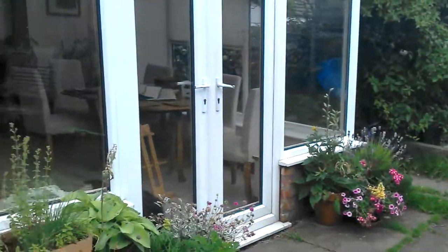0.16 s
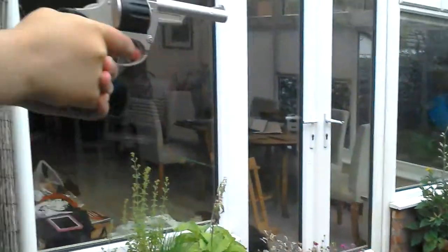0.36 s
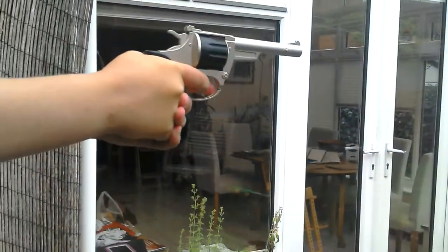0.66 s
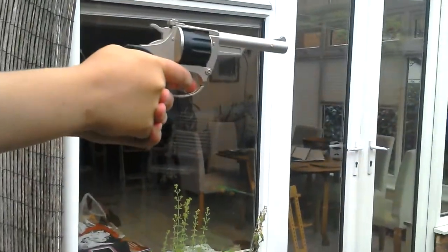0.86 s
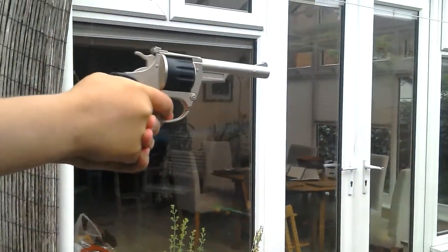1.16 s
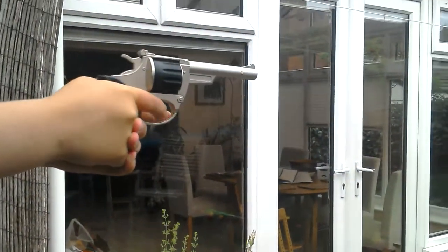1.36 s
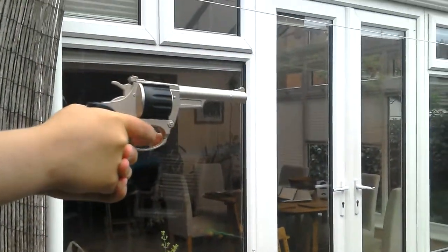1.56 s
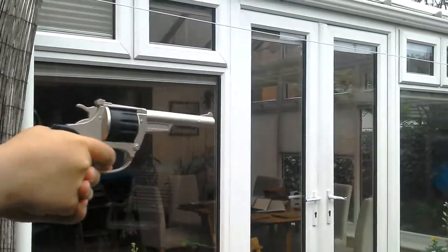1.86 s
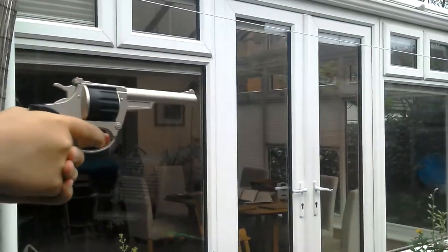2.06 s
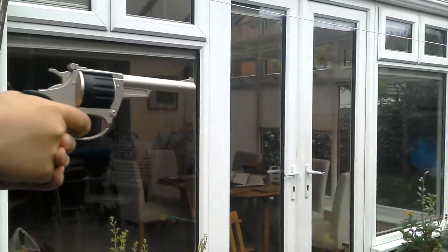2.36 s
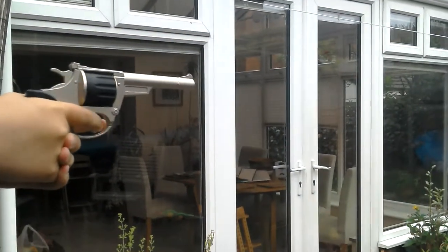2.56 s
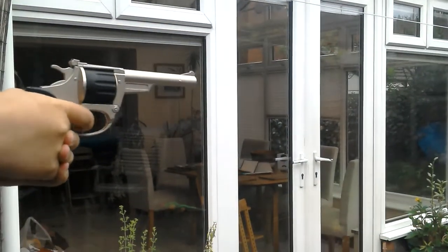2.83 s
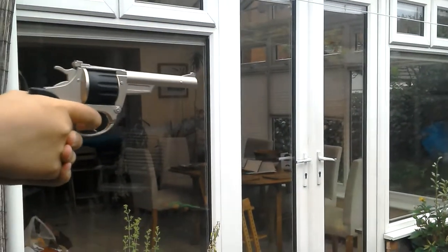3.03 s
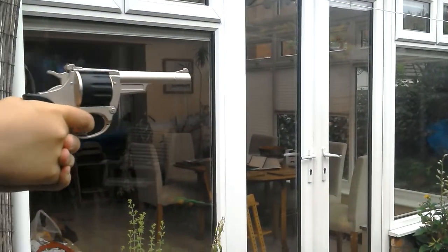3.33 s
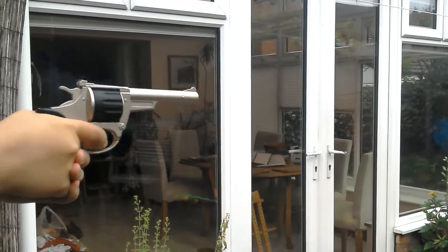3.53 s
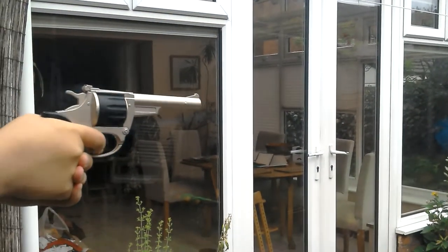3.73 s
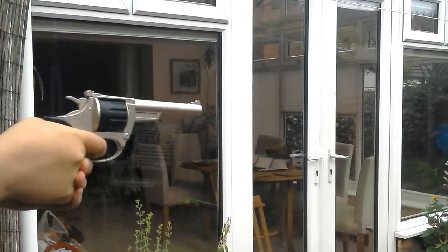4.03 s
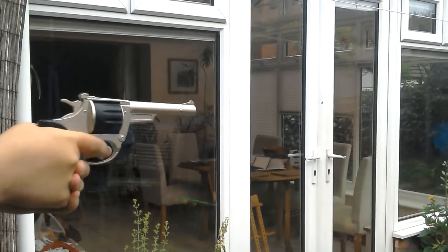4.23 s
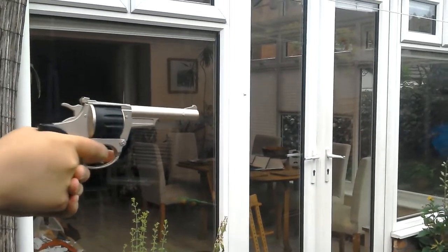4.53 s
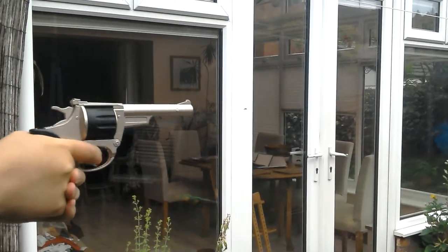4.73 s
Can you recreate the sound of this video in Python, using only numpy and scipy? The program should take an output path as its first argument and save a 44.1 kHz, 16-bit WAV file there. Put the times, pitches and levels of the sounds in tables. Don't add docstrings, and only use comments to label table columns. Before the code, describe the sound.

Three piercing, overloaded cap-gun bangs with short yard echoes, separated by small hard metal clicks over a quiet garden hush.

```python
import sys
import numpy as np
from scipy import signal
from scipy.fft import rfft, irfft
from scipy.io import wavfile
from scipy.ndimage import uniform_filter1d, map_coordinates

SR = 44100
rng = np.random.default_rng(int(sys.argv[2]) if len(sys.argv) > 2 else 0)


def how_loud(loudness_db):
    steps = np.asarray(loudness_db, float) / 20
    return 10 ** steps


def to_wav(s):
    ch = np.atleast_2d(s).T
    pcm = np.round(np.clip(ch, -1, 1) * 32767)
    wavfile.write(sys.argv[1], SR, pcm.astype(np.int16))


N = 215693

# start_s, blast_db, brightness_db_per_octave, yard_ring_hz, ring_db
CAPS_FIRED = [
    (1.0830, 16.5, 3, 6730, 7),
    (3.2077, 22, 2.6, 4850, 1.5),
    (3.637, 23, 1.45, 4450, 3),
]
# pitch_hz, hammer_db, trigger_db
RETURNED_CLATTER = [(300, -37.5, -40), (1200, -25.5, -29.5), (2600, -14, -12.5), (3700, -7, -5.5),
                    (4270, -4, -4), (5180, 0, 2), (5820, -4.5, -4.5), (6850, -12, -15.5),
                    (9100, -14.5, -19), (12000, -21.5, -23.5), (16000, -21, -22)]


def unit(x):
    return x / np.sqrt(np.mean(x ** 2) + 1e-20)


def along(points, hz):
    f, v = np.transpose(points)
    return np.interp(np.log(hz + 1), np.log(f + 1), v)


def wobble(rate):
    knots = rng.standard_normal(int(N * rate / SR) + 4)
    return map_coordinates(knots, [np.arange(N) * rate / SR])


def resonate(x, modes):
    f = np.fft.rfftfreq(len(x), 1 / SR)
    response = 0
    for k, (centre, width, db) in enumerate(modes):
        mode = 1j * f * width / (centre * centre - f * f + 1j * f * width)
        response = response + (-1) ** k * how_loud(db) * mode
    y = irfft(rfft(x) * response, len(x))
    return y / np.abs(y).max()


def causal(points, size=2048):
    cepstrum = irfft(np.log(how_loud(along(points, np.fft.rfftfreq(size, 1 / SR)))), size)
    cepstrum[1:size // 2] *= 2
    cepstrum[size // 2 + 1:] = 0
    h = irfft(np.exp(rfft(cepstrum)), size)
    return h / np.linalg.norm(h)


def coloured(spectrum, patchy_db):
    hz, _, z = signal.stft(rng.standard_normal(N + 4096), SR, nperseg=2048, noverlap=1792)
    field = uniform_filter1d(uniform_filter1d(rng.standard_normal(z.shape), 24, 0), 14, 1)
    z = z * how_loud(patchy_db * unit(field) + along(spectrum, hz)[:, None])
    return unit(signal.istft(z, SR, nperseg=2048, noverlap=1792)[1][:N])


def add(track, s, sound):
    spot = track[round(s * SR):][:len(sound)]
    spot += sound[:len(spot)]


def hush():
    # time_s, level_db
    hush_level = [(0, -62.5), (.65, -65.5), (1.6, -64.5), (2.53, -62), (3.02, -63.5), (4.89, -67)]
    # pitch_hz, level_db_per_hz
    hush_colour = [(90, -26.5), (150, -3.5), (300, -6), (600, -8), (1500, -11), (2200, -12.5),
                   (3000, -11.5), (3600, -8), (4600, -2.5), (5300, -11), (5900, -15.5), (8000, -21.5),
                   (12000, -24.5), (16000, -28)]
    t = np.arange(N) / SR
    reply_db, delay_s, decay_s = -81, .15, 1.2
    reply = 0
    for s, blast_db, *_ in CAPS_FIRED:
        since = np.maximum(t - s, 0)
        late = (1 - np.exp(-(since / delay_s) ** 4)) * how_loud(-60 * since / decay_s)
        reply = reply + how_loud(blast_db + reply_db) * late
    level = how_loud(np.interp(t, *np.transpose(hush_level))) + reply
    return level * how_loud(0.48 * wobble(25)) * coloured(hush_colour, patchy_db=1.66)


def leaves():
    # pitch_hz, level_db_per_hz
    leaf_colour = [(4000, -39), (5500, -5.5), (6300, 0), (7000, -4), (7700, -1.5), (8500, -12.5),
                   (11000, -28.5), (14000, -61.5)]
    # pitch_hz, width_hz, level_db
    whistles = [(6240, 160, 1.5), (7570, 130, -1.5)]
    t = np.arange(N) / SR
    rest_db, swell_db = -87.5, 14.5
    swell_s, rise_s, fall_s = 2.55, 0.24, .8
    stir = np.exp(-((t - swell_s) / np.where(t < swell_s, rise_s, fall_s)) ** 2)
    rustle = coloured(leaf_colour, patchy_db=4.0)
    whistle = how_loud(-4) * unit(resonate(rng.standard_normal(N), whistles))
    return how_loud(rest_db + swell_db * stir) * (rustle + whistle)


def wind():
    # peak_s, peak_db, length_s
    gusts = [(0.006, -44, .03), (0.15, -59, .05), (0.43, -61.5, .07), (1.21, -56.5, .03), (1.68, -67, .06),
             (2.04, -69, .05), (2.341, -55.5, .06), (2.748, -64, .03), (2.952, -59, .1),
             (3.078, -55.5, .05), (3.443, -51.5, .06), (3.848, -57, .07), (4.21, -58.5, .035),
             (4.501, -66.5, .15)]
    # peak_s, peak_db, length_ms
    eddies = [
        (3.045, -41, 1.5),
        (4.211, -52.5, 3),
    ]
    # pitch_hz, level_db_per_hz
    rumble_colour = [(8.8, -39), (15, -6), (43, 2), (209, -20), (268, -32), (300, -26.5), (390, -47),
                     (660, -120)]
    t = np.arange(N) / SR
    strength = how_loud(-67)
    for s, db, length_s in gusts:
        strength = strength + how_loud(db) * np.exp(-((t - s) / length_s) ** 2)
    bumps = sum(how_loud(db) * np.exp(-((t - s) * 1000 / ms) ** 2) for s, db, ms in eddies)
    rumble = unit(how_loud(0.5 * wobble(2.9)) * coloured(rumble_colour, patchy_db=-2.15))
    return bumps + strength * rumble


def scatter_shape(ms):
    # level_db, loss_db_per_ms
    near_doors = (-3.5, 1.4)
    # level_db, loss_db_per_ms
    far_houses = (-51, .08)
    rise_ms, fence_ms, fence_drop_db = 2.5, 71, 4
    past = np.maximum(ms - fence_ms, 0)
    paving_db = -22 - 0.13 * ms - 0.12 * past
    paving_db = paving_db - fence_drop_db * (1 - np.exp(-past / 4))
    doors = how_loud(near_doors[0] - near_doors[1] * ms)
    houses = how_loud(far_houses[0] - far_houses[1] * ms)
    return (1 - np.exp(-(ms / rise_ms) ** 2)) * (doors + how_loud(paving_db) + houses)


def yard(near, far, scatter_db):
    # delay_ms, level_db
    near_walls = [(1.3, -10.5), (4.6, -13), (5.8, -12.5), (9.3, -13.5), (13, -21.5)]
    # pitch_hz, extra_loss_db_per_s
    pitch_loss = [(200, 101), (400, -29.5), (700, -15.5), (1500, -15), (4000, -3), (8000, 48.5),
                  (14000, 137)]
    size = SR // 2
    hz, t, z = signal.stft(rng.standard_normal(size), SR, nperseg=128)
    field = uniform_filter1d(uniform_filter1d(rng.standard_normal(z.shape), 3, 0), 6, 1)
    patches = 2.2 * unit(field)
    z = z * how_loud(patches - t * along(pitch_loss, hz)[:, None])
    tail = signal.istft(z, SR, nperseg=128)[1][:size]
    lumps = 1.1 * map_coordinates(rng.standard_normal(200), [np.linspace(0, 195, size)])
    tail = tail * scatter_shape(np.arange(size) / SR * 1000) * how_loud(scatter_db + lumps)
    echoes = np.zeros(size)
    echoes[0] = 1
    for delay_ms, db in near_walls:
        echoes[round((delay_ms + rng.normal(0, .15)) * SR / 1000)] += how_loud(db + rng.normal(0, 0.62))
    return signal.fftconvolve(near, echoes) + signal.fftconvolve(far, tail)


def thin(x, hz):
    return signal.sosfilt(signal.butter(2, hz, "high", fs=SR, output="sos"), x)


def contacts(rows, metal, clatter, gain_db, rattle_s, scatter_db):
    # pitch_hz, width_hz, level_db
    hollow_frame = [(475, 150, -15), (900, 200, -13), (1130, 120, -10), (1510, 115, 1.5), (1954, 260, -0.6)]
    # pitch_hz, width_hz, level_db
    bright_crack = [(8000, 430, 3), (10200, 4400, -3), (14500, 3300, -2)]
    track, t = np.zeros(N), np.arange(2048) / SR
    touch_s, blow_s, width_s = .0002, .0014, .00003
    blow = np.exp(-((t - blow_s) / width_s) ** 2) + .25 * np.exp(-((t - touch_s) / width_s) ** 2)
    steepness = np.where(t < blow_s, 4, 1)
    rattle = .27 * how_loud(-60 * steepness * np.abs(t - blow_s) / rattle_s)
    for s, db, knock_db, crack_db, yard_db in rows:
        x = blow + rng.standard_normal((3, len(t))) * rattle
        near = thin(resonate(x[0], metal), 1000)
        near += how_loud(knock_db + 0.5) * resonate(x[1], hollow_frame)
        near += how_loud(crack_db + 2.5) * thin(resonate(x[2], bright_crack), 2000)
        far = causal(clatter) + how_loud(knock_db - 17) * resonate(t == 0, hollow_frame)
        add(track, s - .0011, how_loud(db + gain_db) * yard(near, far, scatter_db + yard_db))
    return track


def trigger():
    # start_s, peak_db, frame_knock_db
    loose_ticks = [(0.3894, -59, -9), (0.84, -49, -21.5), (0.9507, -57, -10.5), (1.0124, -45, -21.5),
                   (1.6815, -47, -25), (1.907, -49.5, -23), (2.2175, -55, -22), (2.6748, -41, -13.5),
                   (3.0445, -44.5, -13.5), (3.5218, -39, -12), (3.922, -39.5, -10.5), (4.2089, -58, -12),
                   (4.789, -51, -25)]
    # crack_db, yard_answer_db
    tick_mix = (-33, 0.6)
    # start_s, peak_db
    snaps = [(1.3923, -24.5), (1.963, -22.5), (2.5645, -20.5), (2.98, -22.5), (3.4221, -22), (3.8473, -21),
             (4.2802, -21)]
    # frame_knock_db, crack_db, yard_answer_db
    snap_mix = (-31, -36, 2.7)
    # pitch_hz, width_hz, level_db
    trigger_part = [(2124, 176, -7.5), (3140, 206, -4), (3753, 202, 6), (4680, 580, -2.5), (5090, 320, -7),
                    (6570, 200, -10.5)]
    rows = [(*row, *snap_mix) for row in snaps] + [(*row, *tick_mix) for row in loose_ticks]
    clatter = np.array(RETURNED_CLATTER)[:, [0, 2]]
    return contacts(rows, trigger_part, clatter, gain_db=2.0, rattle_s=.007, scatter_db=-9)


def hammer():
    # start_s, peak_db, frame_knock_db
    latches = [(1.058, -33, 0.6), (1.063, -36.5, 5), (1.703, -53, 12), (2.3423, -32, -11.5),
               (2.765, -49.5, 8), (3.609, -42, -5)]
    # crack_db, yard_answer_db
    latch_mix = (-17, -0.6)
    # hammer_lands_s, blow_db, frame_knock_db, sear_lead_ms, scrape_db
    pulls = [
        (1.0830, -12.5, -8.5, 7.6, -39),
        (1.731, -15, -6.5, 8, -24),
        (2.3436, -9, -21, 11, -29),
        (2.7946, -18, -16, 10.4, -35),
        (3.2067, -14, -7, 6.5, -34.5),
        (3.637, -12.5, -6, 8.5, -28.5),
        (4.0275, -16, -10, 10.2, -22),
        (4.879, -13.5, -8, 10.8, -23.5),
    ]
    # peak_db, frame_knock_db, crack_db, yard_answer_db
    sear_slip = (-43, 8, -30, -1.5)
    # frame_knock_db, crack_db, yard_answer_db
    scrape_mix = (-9, -21.5, -4.5)
    # crack_db, yard_answer_db
    blow_mix = (-19, 3.6)
    # pitch_hz, width_hz, level_db
    hammer_part = [(3860, 120, 4.5), (4820, 210, 0), (4660, 890, -6), (5700, 330, -5.5), (6900, 170, -10)]
    rows = [(*row, *latch_mix) for row in latches]
    for s, db, knock_db, lead_ms, scrape_db in pulls:
        lead_s = lead_ms / 1000
        rows.append((s - lead_s, *sear_slip))
        rows.append((s - .55 * lead_s, scrape_db, *scrape_mix))
        rows.append((s, db, knock_db, *blow_mix))
        rows.append((s + .0052, db - 7.5, knock_db + 3.5, -18.5, -1.8))
    clatter = np.array(RETURNED_CLATTER)[:, [0, 1]]
    return contacts(rows, hammer_part, clatter, gain_db=-6, rattle_s=.012, scatter_db=-7)


def caps():
    # pitch_hz, level_db
    blast_colour = [(60, -29.5), (300, -15), (1000, -6), (2100, -3.5), (3000, -5.5), (3700, -1.5),
                    (4300, -0.5), (4800, -0.5), (5400, -4.5), (6000, -12), (7500, -12.5), (9000, -17),
                    (12000, -20.5), (16000, -20.5)]
    track, t = np.zeros(N), np.arange(SR // 10) / SR
    u = t / 0.00013
    shock = -(1 - u) * np.exp(-u)
    spread = 2 ** (2 * .12)
    for s, db, tilt_db, ring_hz, ring_db in CAPS_FIRED:
        fizz = 0.042 * rng.standard_normal(len(t)) * how_loud(-60 * t / 0.0057)
        colour = causal([(hz, level + tilt_db * np.log2(hz / 4000)) for hz, level in blast_colour])
        ring = causal([(ring_hz / spread, 0), (ring_hz, ring_db), (ring_hz * spread, 0)])
        near = signal.fftconvolve(shock + fizz, colour)[:len(colour)]
        far = signal.fftconvolve(ring, colour)[:len(colour)]
        add(track, s, how_loud(db) * yard(near, far, scatter_db=-13))
    return track


def shoves():
    # start_s, length_ms, offset_of_full_scale
    gas_shoves = [
        (1.0831, .5, 1.1),
        (1.0838, .5, -.8),
        (1.0844, 4.2, .27),
        (3.2071, .7, 2.),
        (3.2086, 1.5, -.6),
        (3.6371, .5, 1.),
        (3.6378, 4.6, .5),
        (3.6430, 3.4, -.85),
    ]
    t_ms = np.arange(N) / SR * 1000

    def edge(ms):
        return 1 - np.exp(-np.maximum(ms, 0) / .3)

    return sum(size * (edge(t_ms - s * 1000) - edge(t_ms - s * 1000 - ms)) for s, ms, size in gas_shoves)


def return_spring():
    # start_s, peak_db, pitch_hz
    twangs = [
        (3.502, -45.5, 1250),
        (3.932, -43.5, 1250),
    ]
    track, t = np.zeros(N), np.arange(SR // 10) / SR
    t60_s, again_s, again_db = 0.032, .0105, -6
    for s, db, hz in twangs:
        swell = 1 - np.exp(-t / 0.0011)
        twang = how_loud(db - 60 * t / t60_s) * swell * np.sin(2 * np.pi * hz * t)
        add(track, s, twang)
        add(track, s + again_s, how_loud(again_db) * twang)
    return track


def scene():
    garden = hush() + leaves() + wind()
    gun = trigger() + hammer() + caps() + shoves() + return_spring()
    return (garden + gun)[None]


def roll_off(x):
    return signal.sosfilt(signal.butter(12, 16660, fs=SR, output="sos"), x)


def record(dry):
    clipped = np.clip(dry, -.99, .99)
    coupling = signal.butter(1, 6.5, "high", fs=SR, output="sos")
    drained = signal.sosfilt(np.tile(coupling, (2, 1)), clipped)
    limit = signal.firwin(255, 15950, fs=SR, window=("kaiser", 8))
    mix = signal.fftconvolve(drained, limit[None], "same")
    return roll_off(mix)


dry = scene()
out = record(dry)
to_wav(out)
```